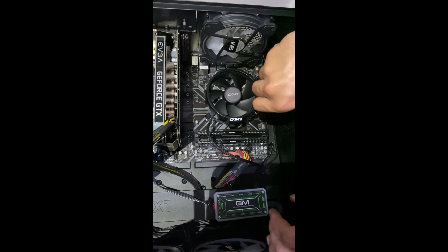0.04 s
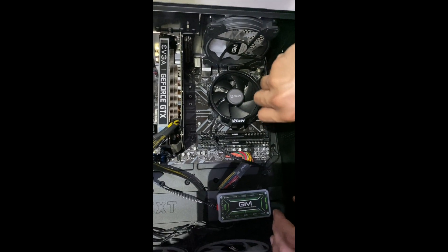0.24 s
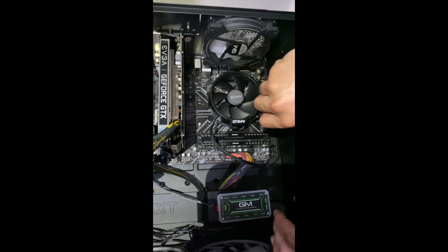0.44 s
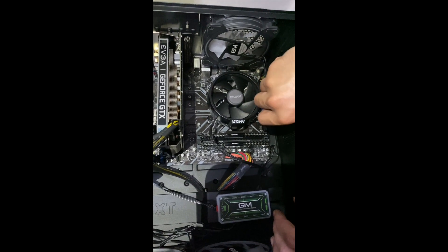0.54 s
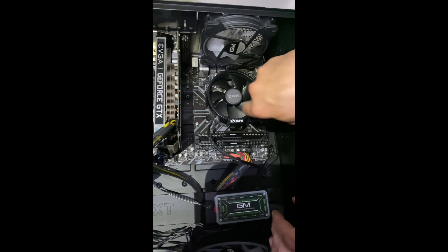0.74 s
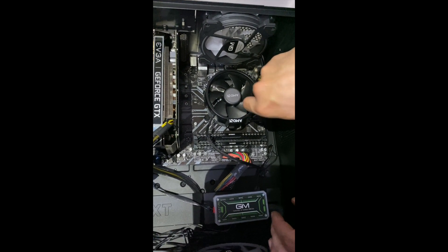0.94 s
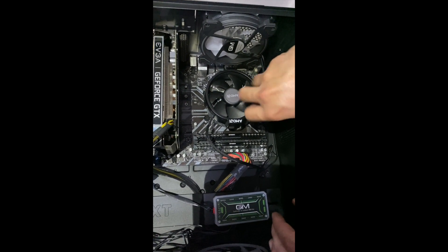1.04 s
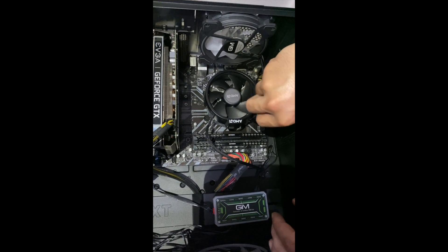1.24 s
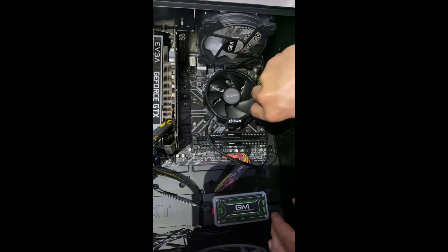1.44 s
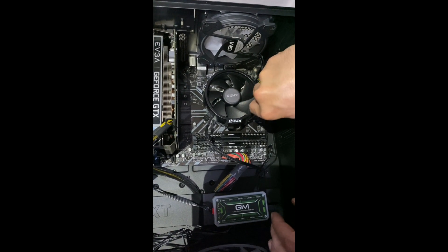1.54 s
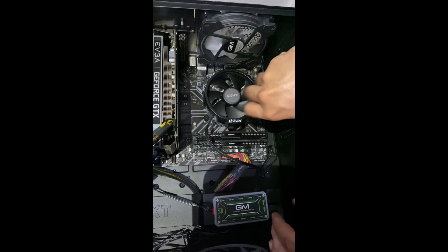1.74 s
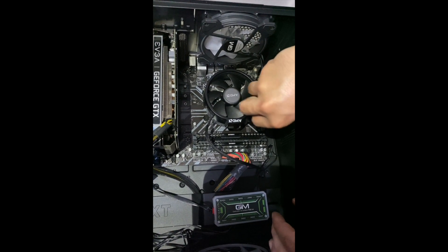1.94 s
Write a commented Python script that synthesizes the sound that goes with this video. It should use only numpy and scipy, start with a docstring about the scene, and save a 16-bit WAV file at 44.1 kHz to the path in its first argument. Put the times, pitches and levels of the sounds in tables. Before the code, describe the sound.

Close stereo pickup of a screwdriver inside a metal case: a faint tick, a sharp quick clatter, then quieter irregular ticks and handling rubs, with short case reflections, a small room tail and low mains hum.

```python
"""Two seconds inside an open metal computer case, where a screwdriver works at small mounting screws.
From the start tool and fingers rub, as gritty noise through ringing metal, over room air and mains hum.
Soon the tip slips: a lone faint tick, a tight flurry of loud ones, then scattered ticks to the end.
Each slip is a short scratchy burst of noise plus decaying notes of screw, board and panel;
dense early reflections in the case and a longer room tail follow the rubbing and the ticks."""
import sys
import numpy as np
from scipy import signal
from scipy.fft import rfft, irfft
from scipy.io import wavfile

SR = 44100
rng = np.random.default_rng(int(sys.argv[2]) if len(sys.argv) > 2 else 0)


def log_audio(samples):
    """Write samples as a 16-bit WAV file to the path given in sys.argv[1]."""
    # one column per channel
    frames = np.atleast_2d(samples).T
    # limit to full scale, then quantise
    limited = np.clip(frames, -1, 1)
    pcm = np.round(limited * 32767).astype(np.int16)
    wavfile.write(sys.argv[1], SR, pcm)


def field_ratio(decibels):
    """Amplitude ratio for a level in dB (20 dB per decade); scalars and array-likes work."""
    return 10 ** (np.asarray(decibels, dtype=float) / 20)


N = 88200  # samples

# Notes of the circuit board. Each row: pitch in Hz, relative level in dB,
# time to fade by 60 dB in seconds.
BOARD_MODES = [(1565, -4, .06), (1800, -3, .03), (2010, 3, .025), (2140, -18, .3), (2350, -6, .05),
               (2630, -6, .05), (2830, -5, .04), (3300, 0, .02), (3420, -17, .08)]
SCRATCH_S = .0011  # time from the start of a slip to the peak of its scratch, in seconds


def evened(x):
    """Scales a sound to an rms of 1."""
    return x / np.sqrt(np.mean(x ** 2) + 1e-20)


def read(points, hz):
    """Reads a curve of (Hz, value) points at any frequency, on a logarithmic pitch scale."""
    f, value = np.transpose(points)
    return np.interp(np.log(hz + 1), np.log(f + 1), value)


def add(mix, s, sound):
    """Adds a stereo or mono sound to the mix from second s on, cut at the end of the mix."""
    part = mix[:, round(s * SR):][:, :sound.shape[1]]
    part += sound[:, :part.shape[1]]


def band(x, lo_hz, hi_hz):
    """Keeps one range of pitch."""
    sos = signal.butter(2, [lo_hz, hi_hz], "bandpass", fs=SR, output="sos")
    return signal.sosfilt(sos, x)


def slow(rate_hz, count):
    """Slow random wander: straight lines between random knots, one row per count."""
    knots = rng.standard_normal((count, 400))
    at = np.arange(N) * rate_hz / SR
    return np.array([np.interp(at, np.arange(400), k) for k in knots])


def rings(modes):
    """One decaying sine per note of a struck body, swelling over its first cycles."""
    hz, db, t60 = np.transpose(modes)[:, :, None]
    t = np.arange(SR // 3) / SR
    rise = 1 - np.exp(-t * hz / 1.6)  # time constant of 1.6 cycles
    fade = field_ratio(db - 60 * t / np.maximum(t60, .01))  # no note fades faster than in 10 ms
    return rise * fade * np.sin(2 * np.pi * hz * t)


def scratch_colour():
    """Filter with the tone colour of a bare tick, its sound packed at the front (minimum phase)."""
    # Each row: frequency in Hz, relative level in dB per Hz.
    colour = [(150, -2.5), (400, -6), (2000, 3), (6000, -3.5), (8500, -7.5), (11000, -9), (16500, -13.5)]
    hz = abs(np.fft.fftfreq(2048, 1 / SR))
    log_gain = np.log(field_ratio(np.maximum(read(colour, hz), -80)))
    spectrum = np.exp(np.conj(signal.hilbert(log_gain)))
    return np.fft.ifft(spectrum).real[:512]


def bodies():
    """For panel, board, screw and case: its decaying notes, and the plain scratch of its range."""
    # Notes of each body. Each row: pitch in Hz, relative level in dB,
    # time to fade by 60 dB in seconds (held to at least 0.01).
    panel_modes = [(850, 0, .07), (635, -24, .2), (775, -15, .05), (950, -10, .07), (1050, -9, .05),
                   (1140, -9, .06), (1222, -14, .05), (1336, -13, .05)]
    screw_modes = [(4630, -11, .06), (5070, -18, .04), (5880, 1, .018), (8423, 5, .0067), (10500, 5, .01)]
    case_modes = [(65, -12, .35), (100, -11, .25), (122, -9, .2), (144, -1, .22), (185, -8, .15),
                  (245, -8, .18), (285, -10, .15), (355, -9, .1)]
    # Level of the plain scratch beside the ring, in dB, for panel, board, screw and case.
    scratch_db = (-5, -1, 5, -6)
    ranges_hz = [(550, 1450), (1450, 4100), (4100, 17000), (150, 600)]
    taps = np.pad(scratch_colour(), (0, 512))
    plain = [band(taps, *edges) for edges in ranges_hz]
    plain = [field_ratio(db) * p / np.linalg.norm(p) for p, db in zip(plain, scratch_db)]
    modes = [rings(m) for m in (panel_modes, BOARD_MODES, screw_modes, case_modes)]
    return list(zip(modes, plain))


def paired(a, b, hz):
    """Left and right spectra: a shared part a, and a part b with opposite sign in the two."""
    # How much the two sides have in common; in the treble it jumps between nearly all and less.
    # Each row: frequency in Hz, correlation set between left and right (1 = shared part only).
    shared_by_pitch = [(60, .97), (300, .8), (1000, .7), (3000, .5), (5600, .8), (6900, .99), (7700, .99),
                       (9100, .65), (10100, .99), (11900, .65), (13100, .99), (14000, .99), (15200, .5)]
    apart = np.sqrt((1 - read(shared_by_pitch, hz)) / 2)
    shared = a * np.sqrt(1 - apart ** 2)
    return np.array([shared + side * apart * b for side in (1, -1)])


def ringing(modes, weights):
    """Stereo ring of one body for given note weights, scaled so its left-right mean has energy 1."""
    out = weights @ modes
    return out / np.linalg.norm(out.mean(0))


def rubbing(parts):
    """Rubbing of tool and fingers: gritty noise under level curves, through the same bodies."""
    # Each row: start in seconds, level in the panel in dB, in the board in dB,
    # in the treble in dB, in the bass in dB.
    rub_levels = [(0, -64, -66.5, -70.5, -55), (0.058, -74, -73.5, -83, -63.5), (0.131, -78, -72, -87, -69),
                  (0.204, -63, -58, -71, -52), (.3, -79, -65.5, -72.5, -58), (.38, -66, -64.5, -76, -57.5),
                  (0.452, -79, -70.5, -85, -61.5), (0.518, -68, -66, -81.5, -61),
                  (0.569, -64, -63, -66, -57), (0.641, -63, -69, -73, -63),
                  (.72, -84.5, -84.5, -75.5, -63.5), (.8, -88, -86, -86, -79),
                  (0.958, -86.5, -95, -86.5, -68), (1.05, -73.5, -71, -66, -53.5),
                  (1.081, -66, -64.5, -79.5, -60.5), (1.14, -85, -110.5, -81.5, -66.5),
                  (1.25, -74.5, -77.5, -88, -73.5), (1.326, -79, -74.5, -72.5, -68),
                  (1.356, -58, -67.5, -66.5, -58.5), (1.476, -58.5, -67, -63, -57.5),
                  (1.517, -76, -82, -73.5, -63), (1.601, -98, -91, -87, -81), (1.662, -74, -84, -88, -74.5),
                  (1.78, -67.5, -78.5, -71, -64.5), (1.852, -83, -76.5, -84.5, -66.5),
                  (2.0, -75, -80.5, -77, -58)]
    s, *levels_db = np.transpose(rub_levels)
    t, hz = np.arange(N) / SR, np.fft.rfftfreq(N, 1 / SR)
    out = np.zeros((2, N))
    grit = field_ratio(2.2 * slow(rate_hz=260, count=1)[0])  # fast random unevenness, scaled in dB
    for k, ((modes, plain), db) in enumerate(zip(parts, levels_db)):
        weights = np.ones((2, len(modes)))
        if k == 0:
            weights[:, 0] = field_ratio(-2.5)  # the panel's main note is a little weaker here
        taps = 1.05 * ringing(modes, weights)
        taps[:, :len(plain)] += plain
        noise = irfft(paired(*rfft(rng.standard_normal((2, N))), hz), N)
        drive = evened(grit * noise) * field_ratio(np.interp(t, s, db))
        out += signal.fftconvolve(taps / np.linalg.norm(taps[0]), drive, axes=1)[:, :N]
    return out


def room_noise():
    """Faint steady room air: stereo noise shaped by a fixed tone colour."""
    # Each row: frequency in Hz, relative level in dB per Hz.
    room_colour = [(15, -43), (30, -8), (60, 5), (134, -3.5), (250, -2.5), (400, -13), (550, -22.5),
                   (1500, -40.5), (2700, -22), (4500, -39), (8000, -47), (13000, -32.5), (16300, -38.5)]
    level_db = -65
    hz = np.fft.rfftfreq(N, 1 / SR)
    spectra = paired(*rfft(rng.standard_normal((2, N))), hz)
    return field_ratio(level_db) * evened(irfft(spectra * field_ratio(read(room_colour, hz)), N))


def hum():
    """Mains hum: a few low tones, each wavering in level and phase."""
    # Each row: pitch in Hz, level before wavering in dB.
    hum_tones = [(62, -71), (119.5, -67), (238, -83.5), (300, -83.5), (360, -71.5)]
    hz, db = np.transpose(hum_tones)[:, :, None]
    count = len(hum_tones)
    waver_db = 3 * slow(rate_hz=20, count=count)
    turns = hz * np.arange(N) / SR + rng.random((count, 1))
    turns = turns + .17 * slow(rate_hz=22, count=count)
    return (np.sqrt(2) * field_ratio(db + waver_db) * np.sin(2 * np.pi * turns)).sum(0)


def tail(x):
    """Sparse random reflections of case and room, partly different on the left and the right."""
    # Each row: frequency in Hz, time for the room tail to fade by 60 dB in seconds.
    room_fade = [(150, 0.3), (1000, .3), (4000, 0.19), (12000, 0.17)]
    case_db, case_t60 = 12, .032  # first rattle inside the case: dB over the room tail, seconds
    taps = np.zeros((2, SR // 2))
    # one reflection in every 10 samples, of random sign
    slots = np.arange(60, SR // 2 - 20, 10)
    at = slots + rng.integers(0, 10, (2, len(slots)))
    np.put_along_axis(taps, at, rng.choice([-1., 1.], at.shape), 1)
    hz, t, z = signal.stft(taps, SR, nperseg=256)
    fade = field_ratio(-60 * t / read(room_fade, hz)[:, None])
    fade = fade + field_ratio(case_db - 60 * t / case_t60)
    taps = signal.istft(paired(*z, hz[:, None]) * fade, SR, nperseg=256)[1]
    taps[:, :60] = 0  # nothing returns at once
    return signal.fftconvolve(x[None], taps / np.linalg.norm(taps[0]), axes=1)[:, :N]


def slips(parts):
    """Each slip: a knock that rings the notes, unevenly from spot to spot, and a ragged burst of grit."""
    # Each row: start in seconds, relative level of the panel in dB, of the board in dB,
    # of the tick (screw) in dB, of the thud (case) in dB,
    # lift of the panel's main note in dB, favoured board pitch in Hz.
    slip_rows = [(.148, -59.5, -71, -86, -77, 16, 1900), (0.2094, -75, -66, -47.5, -56.5, 13, 2000),
                 (.2115, -70, -35.5, -49, -34, 11, 1850), (.2142, -37.5, -55, -32, -52.5, -4, 2090),
                 (.2165, -34, -46, -36.5, -41.5, -19.5, 2900), (.2205, -38.5, -63.5, -68, -53, 2.5, 2200),
                 (.229, -40.5, -50.5, -46.5, -49, -0.5, 2516), (.443, -61, -65.5, -106.5, -70.5, -10, 1620),
                 (0.6277, -57.5, -58.5, -52, -50.5, 3, 3150), (.631, -54, -71.5, -66, -70, 14.5, 3280),
                 (.968, -65.5, -71.5, -68.5, -58, 6.5, 2090), (.9842, -55.5, -56.5, -65, -62.5, -2, 2000),
                 (.996, -62, -59.5, -71, -50, -5, 2830), (0.9994, -46, -68.5, -78.5, -52.5, 13.5, 2180),
                 (1.087, -59.5, -61, -63.5, -62, -6.5, 1800), (1.181, -62.5, -79, -99, -70.5, 24, 1960),
                 (1.237, -62, -71.5, -86.5, -61.5, -12, 1650), (1.27, -64.5, -72.5, -75, -72, -13.5, 3300),
                 (1.293, -60, -67, -73, -66, 12.5, 2000), (1.6415, -56.5, -67, -75.5, -70, 2.5, 2344),
                 (1.681, -72, -74, -91, -79, -12, 3330), (1.7195, -63, -61.5, -69, -58, -2, 2010),
                 (1.7555, -69, -65, -72, -53.5, 19, 2000), (1.76, -59.5, -66, -93, -51.5, 6, 3320),
                 (1.8551, -61.5, -76, -66.5, -57.5, 11, 3400), (1.909, -47.5, -53, -52.5, -50, 5, 3150),
                 (1.995, -56, -57.5, -65.5, -83, -10, 2700)]
    # Random spread of note levels from slip to slip, in dB, for panel, board, screw and case.
    spot_spread_db = (2.2, 3.2, 2.2, 1.8)
    side_db = 2.4  # random spread to each side, panel and board only
    ragged_db = 2.5  # unevenness of the grit
    favoured_octaves = .26  # this far from the favoured pitch, board notes are 6 dB down
    out = np.zeros((2, N))
    u = np.arange(600) / SR / SCRATCH_S
    board_hz = np.transpose(BOARD_MODES)[0]
    for s, *levels_db, lift_db, spot_hz in slip_rows:
        burst = u * np.exp(-u) * rng.standard_normal(len(u))
        burst *= field_ratio(ragged_db * rng.exponential(1, len(u)))
        burst /= np.linalg.norm(burst)
        octaves_off = np.log2(board_hz / spot_hz)
        favour_db = np.maximum(-6 * (octaves_off / favoured_octaves) ** 2, -18)
        for k, ((modes, plain), db) in enumerate(zip(parts, levels_db)):
            spot, ear, sign = rng.standard_normal((3, len(modes)))
            sides_db = side_db * np.outer([1, -1], ear * (k < 2))
            weights = np.sign(sign) * field_ratio(spot_spread_db[k] * spot + sides_db)
            scratch_gain = 1
            if k == 0:  # panel: a rounder knock scratches less
                weights[:, 0] *= field_ratio(lift_db)
                scratch_gain = field_ratio(-max(lift_db, 0))
            if k == 1:  # board
                weights *= field_ratio(favour_db)
            gain = 20 * field_ratio(db)
            add(out, s + SCRATCH_S / 2, gain * ringing(modes, weights))
            add(out, s, gain * scratch_gain * np.convolve(plain, burst)[None])
    return out


def scene():
    """Slips and rubbing with their reflections, over room air and hum."""
    parts = bodies()
    work = slips(parts) + rubbing(parts)
    reflections = field_ratio(-6) * tail(work.mean(0))
    return work + reflections + room_noise() + hum()


def low_pass(x):
    """Removes everything above the highest recorded frequency."""
    return signal.sosfilt(signal.butter(12, 16630, fs=SR, output="sos"), x)


def record(dry):
    """Sets left and right apart in level and phase, pitch by pitch, and cuts the top treble."""
    # Each row: frequency in Hz, level of left over right in dB.
    left_over_right = [(250, 0.9), (800, 4), (2500, -1.5), (6000, 2)]
    # Phase set between the sides; in the treble it climbs in steps, with nearly flat stretches.
    # Each row: frequency in Hz, phase of left ahead of right in half turns.
    phase_steps = [(0, 0), (1900, 0), (2700, .25), (5100, .1), (6850, .98), (7750, 1.02), (10000, 1.97),
                   (10850, 2.03), (13050, 2.97), (14100, 3.03), (15700, 4), (22050, 4)]
    edge_hz = 16300
    size = N + 4096
    hz = np.fft.rfftfreq(size, 1 / SR)
    half = np.array([[.5], [-.5]])  # each side takes half of the difference
    level = field_ratio(half * read(left_over_right, hz))
    phase = np.pi * half * np.interp(hz, *np.transpose(phase_steps))
    sides = level * np.exp(1j * phase)
    mix = irfft(rfft(dry, size) * sides * (hz < edge_hz), size)[:, :N]
    return low_pass(mix)


dry = scene()
out = record(dry)
log_audio(out)
```